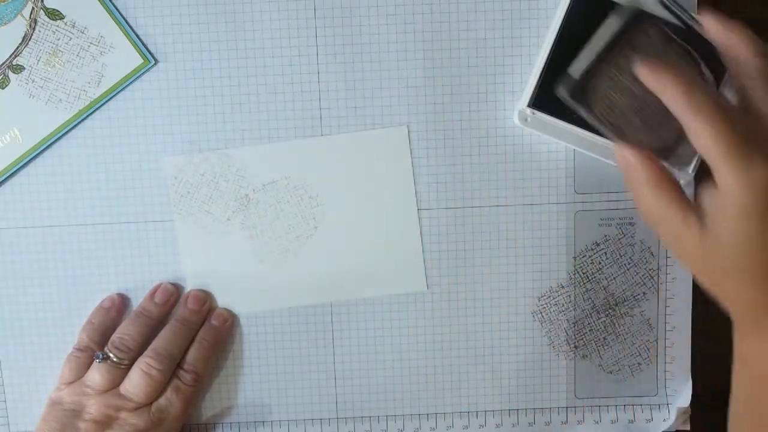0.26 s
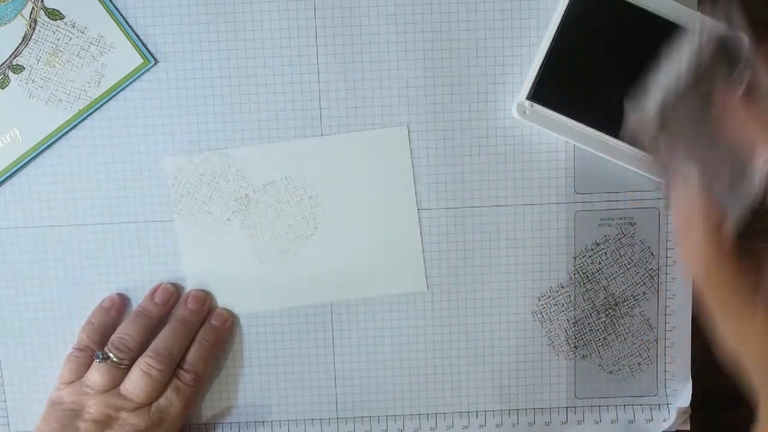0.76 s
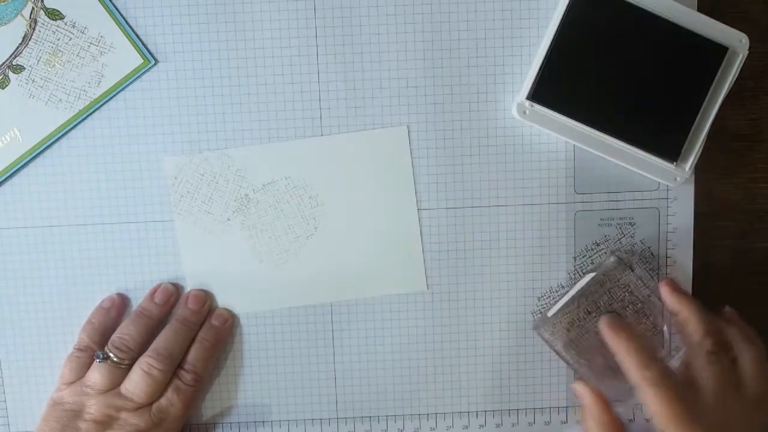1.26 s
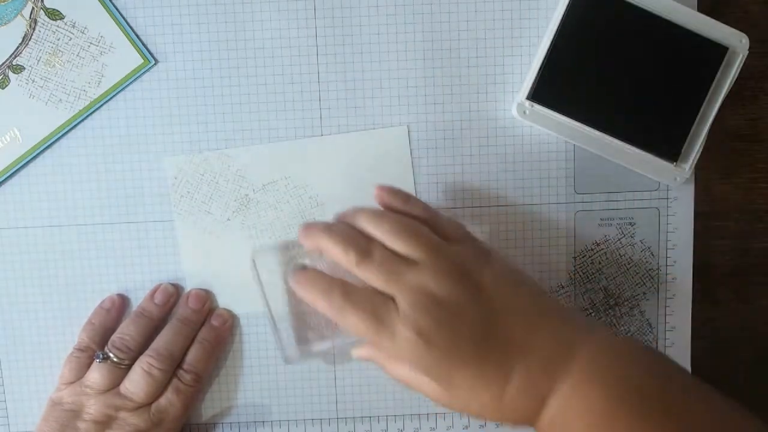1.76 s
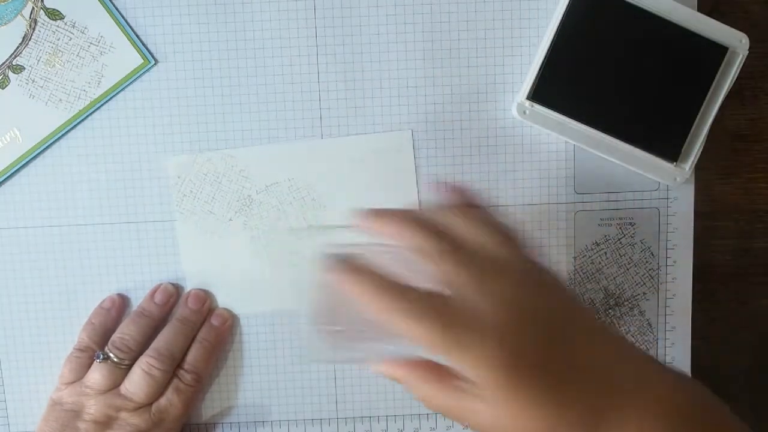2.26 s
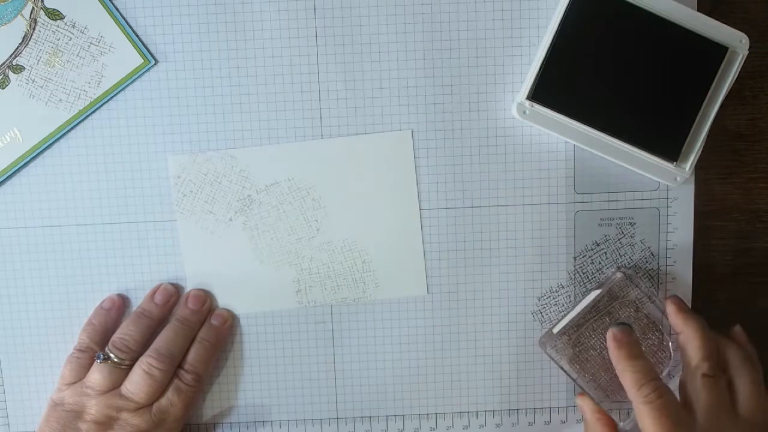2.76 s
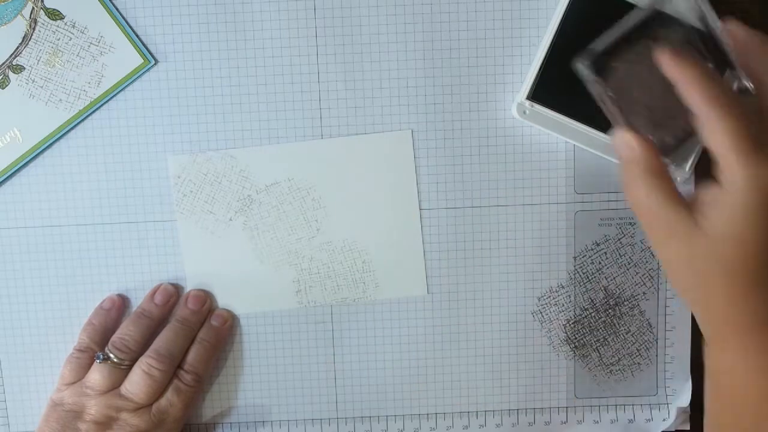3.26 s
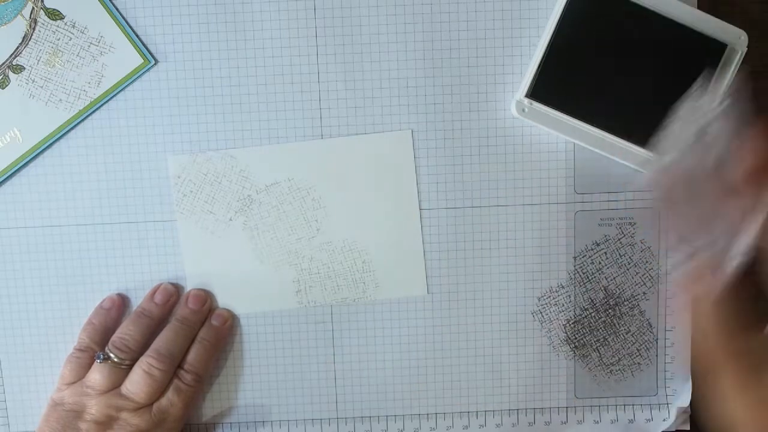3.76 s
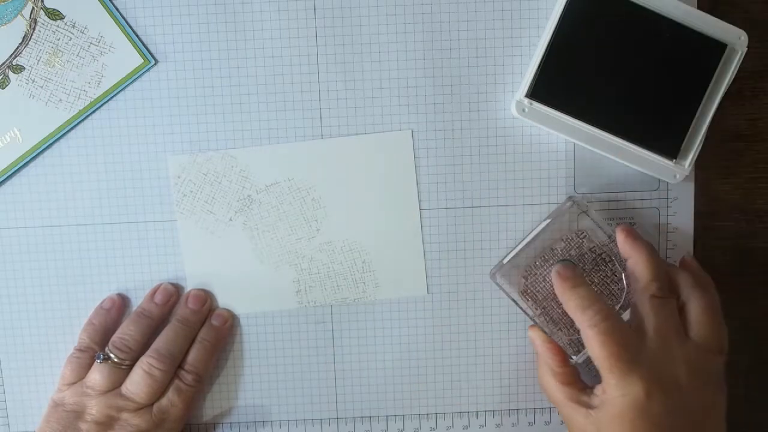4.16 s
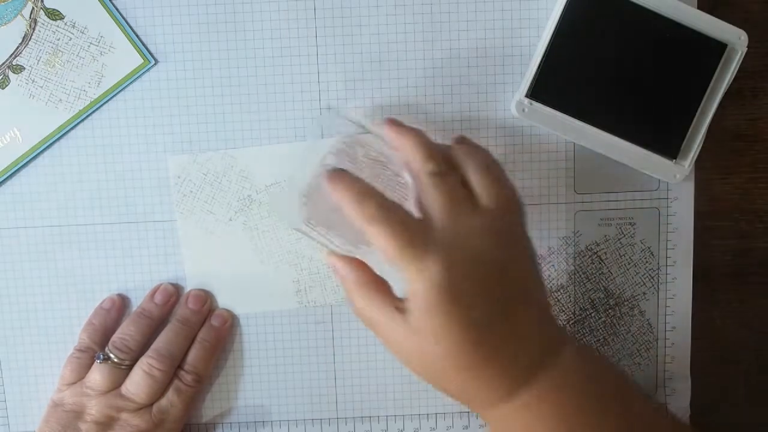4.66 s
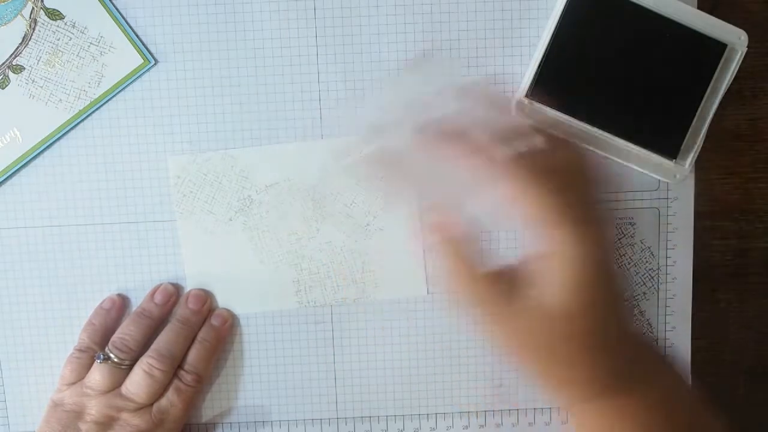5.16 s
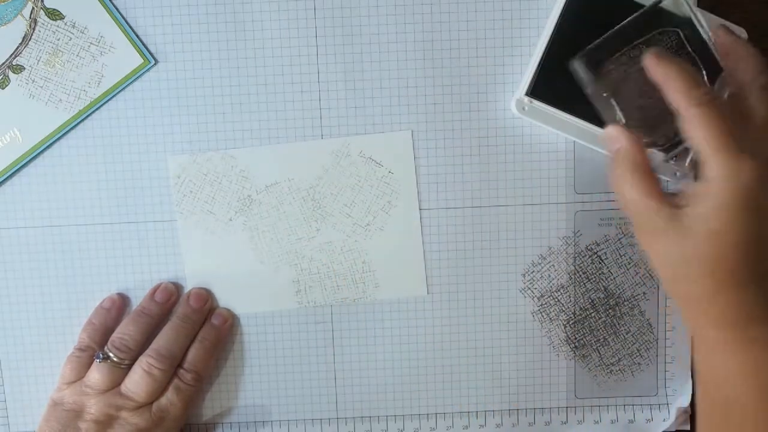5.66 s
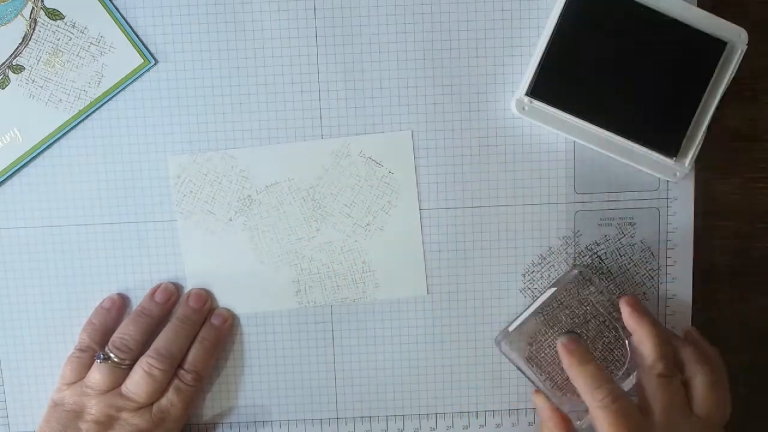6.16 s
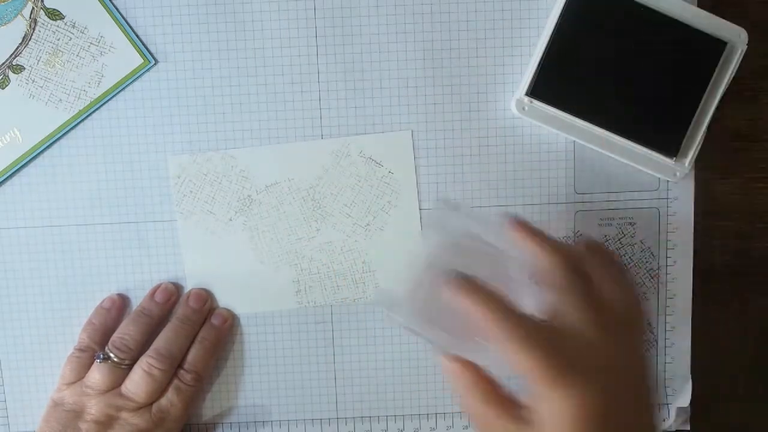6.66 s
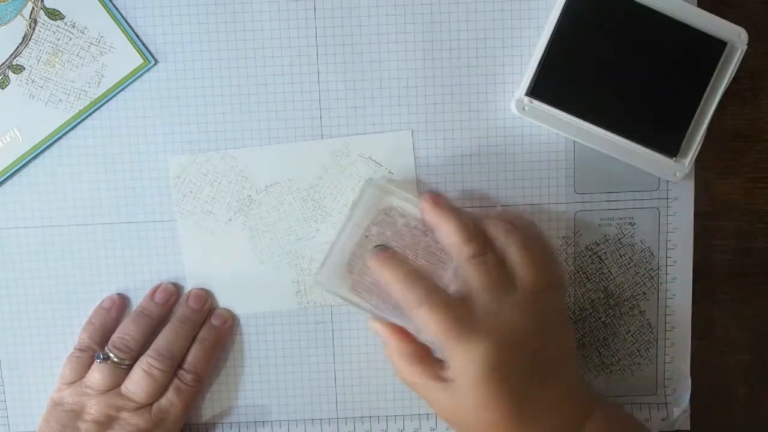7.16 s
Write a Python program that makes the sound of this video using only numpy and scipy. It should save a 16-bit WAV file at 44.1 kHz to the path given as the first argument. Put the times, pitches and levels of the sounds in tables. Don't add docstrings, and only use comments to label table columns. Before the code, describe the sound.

Faint low hush of a small soft room, heard by a close stereo microphone. At 0.2 s a stamp block lands on an ink pad with a low hollow table thump and bright plastic clack; a thin peel follows near 0.5. A tight slap on scrap paper at 0.9 ends in a tacky crackle at 1.15, with small clacks after it. Light brushing leads to a double thump on card at 1.7 and a peel at 2.1. The sharpest, loudest smack comes at 2.5, peeling at 2.75. Pad thump and clacks at 3.2, brisk slap at 3.9, peel at 4.1, solid card press at 4.65, short dull peel at 4.95. Pad again at 5.3 with rattling rebounds, softer paper thump at 6.0, peel and hard plastic clacks around 6.3, bright knock at 6.7, crackly lift at 7.05, and a final deep thump at 7.4.

```python
import sys
import numpy as np
from scipy import signal
from scipy.fft import rfft, irfft, next_fast_len
from scipy.io import wavfile

SR = 44100
rng = np.random.default_rng(int(sys.argv[2]) if len(sys.argv) > 2 else 0)


def decibels_to_gain(level_db):
    exponent = np.asarray(level_db, float) / 20
    return 10 ** exponent


def output_pcm(signal):
    pcm = np.clip(np.atleast_2d(signal).T, -1, 1) * 32767
    wavfile.write(sys.argv[1], SR, np.round(pcm).astype(np.int16))


N = 327222

# pitch_hz, level_db
HUSH_SPECTRUM = [(15, -48), (25, 0.5), (53, -3.5), (70, -2), (87, -5), (141, -2.5), (317, -13.5),
                 (394, -11), (531, -16.5), (591, -9.5), (1130, -16.5), (2220, -16.5), (7310, -30.5),
                 (14400, -31), (16000, -32)]
# pitch_hz, likeness (1 = the same)
HUSH_LIKENESS = [(60, 0.84), (240, 0.29), (950, 0.22), (3770, 0.03), (15000, -9)]
# middle_s, peak_db, half_length_s
SWEEPS = [(1.594, -61, 0.036), (1.78, -60, 0.078), (3.357, -61.5, 0.031), (4.507, -71, 0.15),
          (6.68, -75, 0.05)]
# pitch_hz, level_db, t60_s
ROOM_BANDS = [(284, -39.5, 0.19), (660, -35.5, 0.16), (1257, -35.5, 0.18), (2110, -35.5, 0.1),
              (3200, -36.5, 0.18), (4470, -37, 0.086), (6830, -30.5, 0.11), (8200, -36, 0.2),
              (11740, -50.5, 0.15)]
# pitch_hz, width_hz, gain_db
MIC_HOUSING = [(1327, 344, -9), (6960, 3430, -7), (8600, 1470, 3.5)]

# pitch_hz, level_db
CASE_MODES = [(480, -34), (760, -6.5), (880, 5.5), (1100, 1), (1480, -5), (1600, 17.5), (1750, 17),
              (1900, -12), (2200, -6), (2450, 9.5), (2850, -0.5), (3300, 5), (3800, 3)]
# start_s, peak_db, softness_ms
CASE_KNOCKS = [(0.2378, -16, 0.1), (0.247, -37, 0.05), (0.509, -35, 0.071), (0.52, -46, 0.05),
               (1.222, -24, 0.036), (1.2315, -21, 0.05), (1.243, -37, 0.046), (1.251, -27, 0.039),
               (3.215, -20.5, 0.099), (5.333, -31, 0.075), (5.345, -33, 0.11), (6.357, -18, 0.069),
               (6.3655, -12.5, 0.035), (6.376, -20.5, 0.028), (6.383, -26, 0.021)]
# first_s, peak_db
CASE_REBOUNDS = [(3.237, -37.5), (5.355, -36.5)]
REBOUND_S, REBOUND_LOSS_DB, REBOUND_SOFT_MS = 0.02, 1.5, 0.19

# start_s, peak_db, fade_ms, treble_db
PAD_PEELS = [(0.486, -33, 4.3, -5.5), (.497, -31.5, 9.2, 3), (3.402, -32, 8.7, -18),
             (3.418, -30.5, 17.4, -1), (5.544, -33, 15.4, 3)]
PAD_RISE_SHARE, PAD_LOW_HZ = 0.42, 2480
# start_s, peak_db, fade_ms, treble_db
PAPER_PEELS = [(1.157, -23, 5.9, -23), (2.066, -21, 6, -6), (2.755, -20.5, 10.3, -6),
               (4.106, -22.5, 9.6, -26), (4.948, -14.5, 5.3, -37), (6.303, -19, 6.9, -25),
               (7.065, -21, 9.3, 3.5)]
PAPER_RISE_MS, PAPER_LOW_HZ = 4.4, 1330

# start_s, peak_db
FLAT_SMACKS = [
    (2.4897, -1),
    (2.4910, -2.5),
]
# start_s, peak_db, body_hz, length_ms
EDGE_TICKS = [(0.2245, -24.5, 1580, 1.3), (0.9204, -23.5, 1710, 1.6), (0.9258, -12, 1720, 3.9),
              (1.7273, -36, 2190, 1.5), (2.4893, -8, 2220, 0.95), (3.203, -35, 2500, 12),
              (3.2137, -22.5, 1560, 1.2), (3.8192, -40, 1750, 1.74), (3.8708, -16, 1600, 2.2),
              (4.6452, -15, 3400, 1.5), (4.944, -68, 4960, 0.65), (4.9467, -39, 3050, 0.57),
              (5.319, -32.5, 1990, 7.6), (5.3424, -27.5, 1600, 1.6), (6.0261, -28.5, 1330, 3.2),
              (6.7363, -10, 1960, 1.47), (7.3907, -14.5, 1570, 10.4)]
EDGE_TREBLE_DB, EDGE_CYCLES = -5, 2.26
# start_s, peak_db, body_hz, ring_cycles
ROCK_TICKS = [(0.2133, -36, 2130, 2.9), (0.237, -9, 1580, 11), (0.2464, -47, 1570, 4.3),
              (0.5078, -31, 1480, 4.5), (1.738, -15, 2820, 0.76), (1.7514, -33.5, 1610, 6.5),
              (1.8214, -33, 1430, 9.3), (2.4918, -15, 1860, 7.1), (2.4977, -17, 1610, 7.4),
              (3.8625, -13.5, 2940, 0.71), (4.6545, -15.5, 1530, 1.7), (5.3319, -19, 1270, 2.8),
              (5.3744, -34, 1550, 4.2), (6.0149, -33.5, 2450, 2), (6.0521, -40, 2340, 2.9),
              (6.7436, -13, 2300, 6.4), (6.7604, -34, 2200, 3.9)]
ROCK_TREBLE_DB, ROCK_MS = -10, 1.7

# pitch_hz, level_db, t60_s
PANEL_MODES = [(53.4, -17.5, 0.31), (98.6, -10, 0.22), (118, -1, 0.21), (124, -14.5, 0.08),
               (145.8, -6, 0.23), (171.6, -10.5, 0.22), (199.9, -8.5, 0.14)]
# pitch_hz, level_db, t60_s
WOOD_MODES = [(221.6, 5, 0.053), (255, -2, 0.1), (283, -6.5, 0.068), (310, 1.5, 0.039), (343.6, -7, 0.077),
              (371, -11, 0.11), (394, -9.5, 0.096), (448, 2, 0.06), (507, -6, 0.066), (547, 2.5, 0.0975),
              (573, -21, 0.15), (620, -6, 0.037), (716, -13.5, 0.15), (755, 6, 0.013), (819, -1.5, 0.11),
              (898, 7.5, 0.059), (989, 12, 0.032), (1180, -21, 0.065)]
# start_s, peak_db, slap_hz, knock_db, sway_db
PRESSES = [(0.212, -13, 138, -29, -10), (0.228, -24, 122, -15.5, 6), (1.734, -17.5, 113, -29, 4),
           (1.7455, -16.5, 125, -33, 7), (3.2035, -11.5, 138, -24, 3), (4.6455, -9, 133, -16, 0.5),
           (4.6468, -16.5, 358, -18, -1), (5.3195, -8.5, 134, -35, -4), (6.0155, -26, 156, -28, -13),
           (6.0225, -18.5, 118, -21, -8), (6.7384, -11, 340, -22, -9), (6.736, -10, 128, -25, -1),
           (6.776, -23.5, 133, -16, -5), (7.391, -6.5, 147, -16.5, 1)]
# start_s, peak_db, slap_hz, knock_db, sway_db
BRISK_PRESSES = [
    (.9228, -10, 310, -17.5, -12),
    (0.9238, -9.5, 173, -25, 0.5),
    (2.4897, -12, 330, -18, -12),
    (2.4888, -14, 143, -14, -6),
    (3.8642, -9, 330, -16, -6),
    (3.8627, -13, 140, -14, -10),
]
PANEL_RING_DB, HAND_DAMPING = -10, 1
# start_s, peak_db, sway_db
LIFTS = [(0.517, -32, 15), (1.151, -46.5, 17), (2.066, -38, 9), (2.754, -55, -6), (3.416, -47.5, -15),
         (4.104, -47, -6), (4.943, -34.5, 4), (5.537, -48, -8), (6.299, -48, 15), (7.065, -53, -9)]
LIFT_SLAP_HZ, LIFT_KNOCK_DB, LIFT_RING_DB = 125, -12.5, -3


def at_hz(points, hz):
    table_hz, values = np.transpose(points)
    return np.interp(np.log(hz), np.log(table_hz), values)


def passed(x, hz, kind, order=2):
    return signal.sosfilt(signal.butter(order, hz, kind, fs=SR, output="sos"), x)


def peak_one(x):
    return x / np.abs(x).max()


def add(out, start_s, sound):
    at = round(start_s * SR)
    out[at:at + len(sound)] += sound[:N - at]


def grains(size, per_s, uneven_db):
    heights = decibels_to_gain(uneven_db * np.minimum(rng.exponential(1, size), 4))
    heights = heights * rng.choice([-1, 1], size)
    return heights * (rng.random(size) < per_s / SR)


def half_wave(t, length_s):
    force = np.sin(np.pi * np.clip(t / length_s, 0, 1)) ** 2
    return force / force.sum()


def ring(force, hz, t60_s):
    decay = decibels_to_gain(-60 / (t60_s * SR))
    w = 2 * np.pi * hz / SR
    return signal.lfilter([0, np.sin(w)], [1, -2 * decay * np.cos(w), decay * decay], force + 1e-18)


def struck(modes, force, spread_db):
    spot = decibels_to_gain(rng.normal(0, spread_db, len(modes))) * rng.choice([-1, 1], len(modes))
    return [weight * decibels_to_gain(db) * ring(force, hz, t60_s) for (hz, db, t60_s), weight in zip(modes, spot)]


def hush():
    hz = np.maximum(np.arange(N // 2 + 1) * SR / N, 1)
    mid, side = rfft(rng.standard_normal((2, N))) * decibels_to_gain(at_hz(HUSH_SPECTRUM, hz))
    alike = np.clip(at_hz(HUSH_LIKENESS, hz), 0, 1)
    noise = irfft(np.sqrt(1 + alike) * mid + np.sqrt(1 - alike) * side * [[1], [-1]], N)
    return decibels_to_gain(-58.5) * noise / noise.mean(0).std()


def room(x):
    first_echo_s = 0.00072
    t = np.arange(SR // 2) / SR
    white = rng.standard_normal((2, 2, len(t)))
    tail = 0
    for k, (hz, db, t60_s) in enumerate(ROOM_BANDS):
        band = passed(white[k % 2], [hz / 1.35, hz * 1.35], "band")
        band = band + band.sum(0) * 500 / hz
        tail = tail + decibels_to_gain(db - 60 * t / t60_s) * band
    tail = tail * np.clip(t / first_echo_s - 1, 0, 1)
    return signal.fftconvolve(x[None], tail, axes=1)[:, :N]


def microphone_housing(x):
    for hz, width_hz, db in MIC_HOUSING:
        w, a = 2 * np.pi * hz / SR, decibels_to_gain(db / 2)
        q = np.sin(w) * width_hz / hz / 2
        middle = -2 * np.cos(w)
        x = signal.lfilter([1 + q * a, middle, 1 - q * a], [1 + q / a, middle, 1 - q / a], x)
    return x


def rustle():
    t = np.arange(N) / SR
    level = decibels_to_gain(-73.5)
    for middle_s, db, half_s in SWEEPS:
        level = level + decibels_to_gain(db) * np.exp(-((t - middle_s) / half_s) ** 2)
    brush = np.array([grains(N, 10000, 5.1), grains(N, 12000, 4.2)])
    brush = passed(brush, [3000, 10000], "band", order=1)
    return level * brush / brush.std()


def all_knocks():
    rebounds = [(first_s + k * REBOUND_S, db - k * REBOUND_LOSS_DB, REBOUND_SOFT_MS)
                for first_s, db in CASE_REBOUNDS for k in range(4)]
    return CASE_KNOCKS + rebounds


def loose_case():
    out, t = np.zeros(N), np.arange(SR // 8) / SR
    modes = [(hz, db, 11 / hz) for hz, db in CASE_MODES]
    for start_s, db, soft_ms in all_knocks():
        force = grains(len(t), 1800, 3.2) * 0.28 * np.exp(-t / 0.005)
        force[0] = 1
        keep = np.exp(-1e3 / (soft_ms * SR))
        force = signal.lfilter([1 - keep], [1, -keep], force)
        clack = sum(struck(modes, force, spread_db=1.5))
        clack = passed(clack, [380, 4500], "band", order=3)
        add(out, start_s, decibels_to_gain(db) * peak_one(clack))
    return out


def all_peels():
    pad = [(start_s, db, PAD_RISE_SHARE * fade_ms, fade_ms, treble_db, PAD_LOW_HZ)
           for start_s, db, fade_ms, treble_db in PAD_PEELS]
    paper = [(start_s, db, PAPER_RISE_MS, fade_ms, treble_db, PAPER_LOW_HZ)
             for start_s, db, fade_ms, treble_db in PAPER_PEELS]
    return sorted(pad + paper)


def ink_film():
    lead_ms = 40
    out, ms = np.zeros(N), np.arange(SR // 6) * 1e3 / SR - lead_ms
    for start_s, db, rise_ms, fade_ms, treble_db, low_hz in all_peels():
        swell = np.exp(np.minimum(ms / rise_ms, -ms / fade_ms))
        snaps = grains(len(ms), 14000, 1.0) * swell
        body = passed(passed(snaps, low_hz, "high"), 7100, "low", order=1)
        treble = peak_one(passed(snaps, 6000, "high"))
        add(out, start_s - lead_ms / 1e3, decibels_to_gain(db) * (peak_one(body) + decibels_to_gain(treble_db) * treble))
    return out


def flat_smacks():
    out, t = np.zeros(N), np.arange(SR // 100) / SR
    for start_s, db in FLAT_SMACKS:
        spike = passed(half_wave(t, 3.5e-4), 350, "high", order=1)
        add(out, start_s, decibels_to_gain(db) * peak_one(spike))
    return out


def all_ticks():
    edges = [(*row, EDGE_TREBLE_DB, EDGE_CYCLES) for row in EDGE_TICKS]
    rocks = [(start_s, db, hz, ROCK_MS, ROCK_TREBLE_DB, cycles) for start_s, db, hz, cycles in ROCK_TICKS]
    return sorted(edges + rocks)


def block_edges():
    out, ms = np.zeros(N), np.arange(SR // 20) * 1e3 / SR
    for start_s, db, body_hz, length_ms, treble_db, cycles in all_ticks():
        burst = grains(len(ms), 9000, 2.26) * np.exp(-ms / length_ms) * np.minimum(ms / 0.66, 1)
        body = peak_one(ring(burst, body_hz, max(cycles, 1) / body_hz))
        body = body + 0.32 * peak_one(passed(burst, [900, 4500], "band"))
        body = passed(body, 6000, "low")
        treble = peak_one(passed(burst, 4100, "high"))
        add(out, start_s, decibels_to_gain(db) * (peak_one(body) + decibels_to_gain(treble_db) * treble))
    return out


def all_pushes():
    def pressed(rows):
        return [(*row, PANEL_RING_DB - HAND_DAMPING * (row[1] + 12)) for row in rows]
    lifts = [(start_s, db, LIFT_SLAP_HZ, LIFT_KNOCK_DB, sway_db, LIFT_RING_DB)
             for start_s, db, sway_db in LIFTS]
    return sorted(pressed(PRESSES) + lifts) + pressed(BRISK_PRESSES)


def table_top():
    slap_cycles, tight_slap_hz = 3.75, 190
    out, t = np.zeros(N), np.arange(SR // 2) / SR
    spreading = 1 - np.exp(-(t / 0.012) ** 2)
    for start_s, db, slap_hz, knock_db, sway_db, ring_db in all_pushes():
        force = half_wave(t, 0.66 / slap_hz)
        jolt = np.diff(force, prepend=0)
        dies_s = slap_cycles / slap_hz * min(1, tight_slap_hz / slap_hz)
        slap = peak_one(ring(ring(jolt, slap_hz, dies_s), slap_hz, dies_s))
        sway, *panel = struck(PANEL_MODES, force, spread_db=6.5)
        board = decibels_to_gain(sway_db) * sway + decibels_to_gain(ring_db) * sum(panel)
        knock = sum(struck(WOOD_MODES, half_wave(t, 0.0016), spread_db=0.0))
        add(out, start_s, decibels_to_gain(db) * (slap + spreading * board + decibels_to_gain(knock_db) * knock))
    return out


def two_ports(direct):
    left_lag_s = 2.4e-5
    size = next_fast_len(N + SR)
    hz = np.arange(size // 2 + 1) * SR / size
    late = np.exp(-2j * np.pi * hz * left_lag_s)
    return np.array([irfft(rfft(direct, size) * late, size)[:N], direct])


def scene():
    bright = passed(block_edges() + flat_smacks() + ink_film(), 9640, "low")
    low, case = table_top(), loose_case()
    ports = two_ports(bright + low + case)
    echoes = room(bright + decibels_to_gain(-6) * low + decibels_to_gain(3) * case)
    heard = microphone_housing(ports + echoes + rustle()) + hush()
    return passed(heard, 38, "high", order=3)


def roll_off(x):
    return signal.sosfilt(signal.butter(12, 15850, fs=SR, output="sos"), x)


def record(dry):
    return roll_off(dry)


dry = scene()
out = record(dry)
output_pcm(out)
```